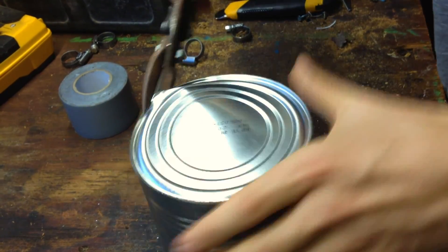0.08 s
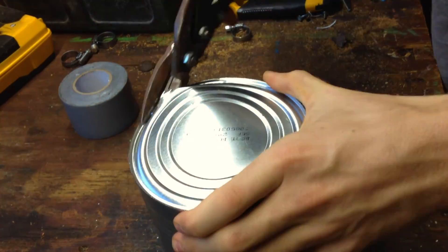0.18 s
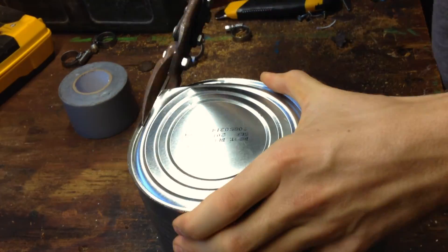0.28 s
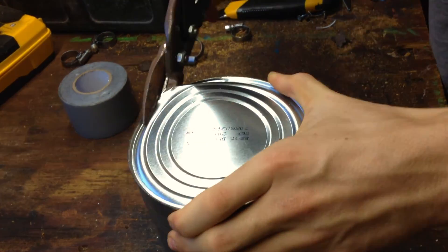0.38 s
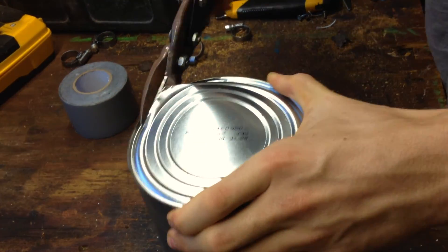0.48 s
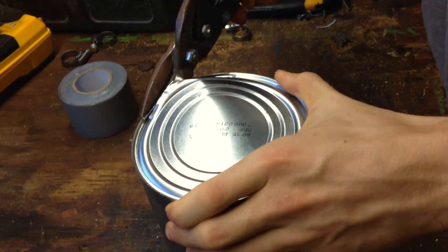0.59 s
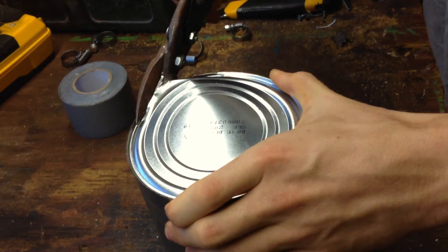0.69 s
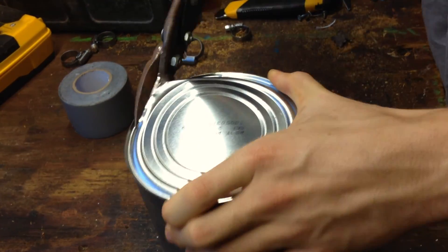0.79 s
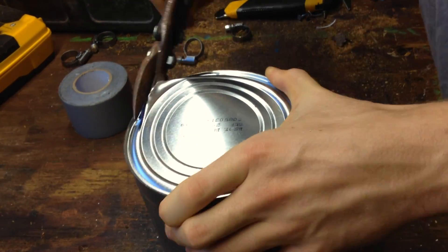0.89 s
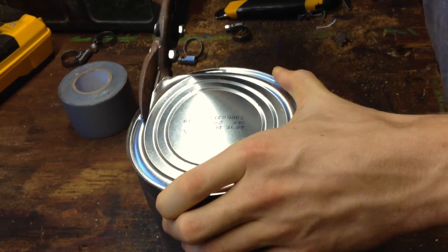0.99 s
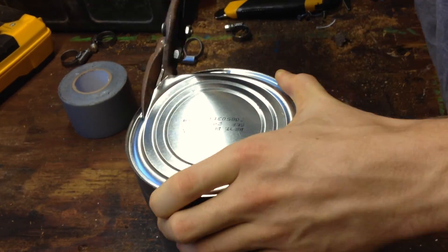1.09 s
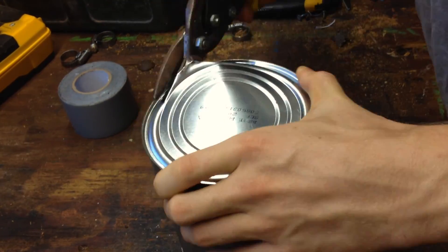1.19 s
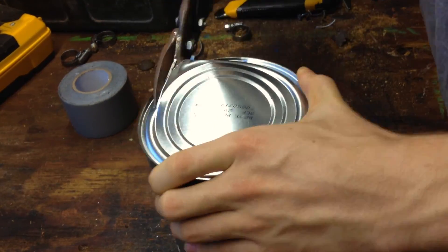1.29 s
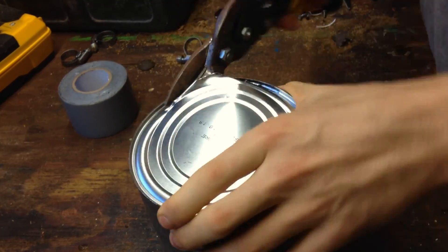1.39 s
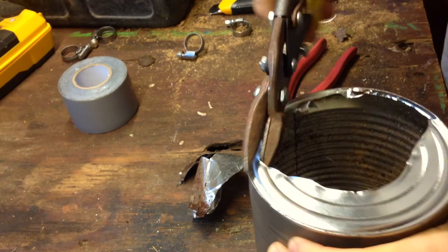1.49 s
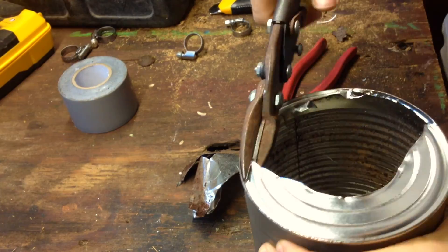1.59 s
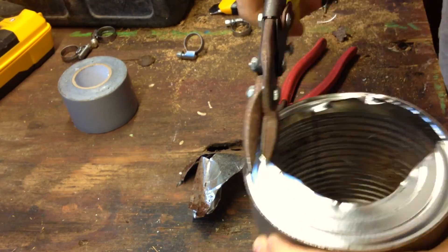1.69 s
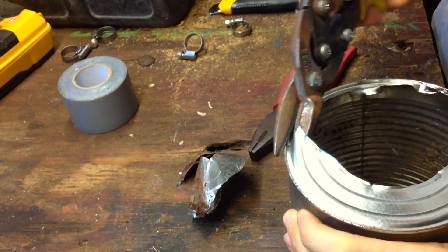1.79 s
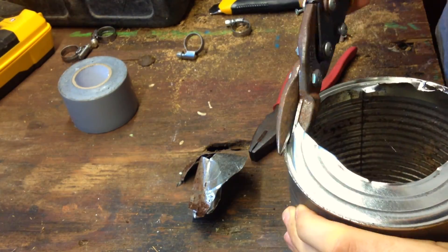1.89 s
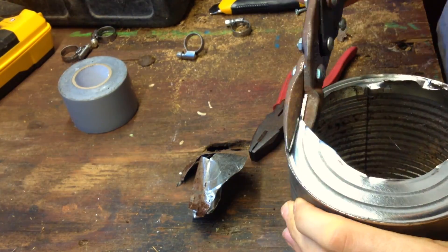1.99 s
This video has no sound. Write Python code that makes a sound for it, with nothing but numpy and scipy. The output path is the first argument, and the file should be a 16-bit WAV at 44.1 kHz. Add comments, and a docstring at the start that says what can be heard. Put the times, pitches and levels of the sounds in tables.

```python
"""Tin snips cutting a can

Close by at a workbench, tin snips bite round the rim of a thin steel can held in one hand.
The steel parts in sharp cracks, the wall pops as it buckles, and the blades grate and squeak along
the cut edge. The hand keeps the can's ring short, and it all dies away in a small workshop."""
import sys
import numpy as np
from scipy import signal
from scipy.fft import rfft, irfft
from scipy.io import wavfile

SR = 44100
rng = np.random.default_rng(int(sys.argv[2]) if len(sys.argv) > 2 else 0)


def unload_audio(sound):
    """Save the sound as a 16-bit wav file, at the path given as the first command line argument."""
    columns = np.transpose(np.atleast_2d(sound))
    # keep every value between -1 and 1, then stretch to whole-number steps
    steps = np.round(np.clip(columns, -1, 1) * 32767)
    wavfile.write(sys.argv[1], SR, steps.astype(np.int16))


N = 88200
T = np.arange(4096) / SR  # time in seconds within one short sound

# Levels in all tables are relative. A t60 is the time a ring takes to fade by 60 dB.
# the notes at which the hand-held can rings: f/Hz, level/dB
CAN_NOTES = [(785, -12.5), (1060, -4), (1491, 0), (2207, -9.5), (5345, 1.5)]
CAN_T60_S = .024
# tone colour of the can's thin wall: f/Hz, level/dB
WALL_COLOUR = [(330, -33), (550, -7.5), (670, 5), (1100, 4.5), (1550, 1), (2100, -2), (5000, -31)]
# tone colour of the steel's hiss and ticks: f/Hz, level/dB
HISS_COLOUR = [(400, -54), (2000, 7), (4400, 1), (7200, 2.5), (16000, -8)]


def amp(db):
    """Turn decibels into a gain."""
    return 10 ** (np.asarray(db) / 20)


def unit(x, window_s=.003):
    """Give a short burst the same energy as a level of 1 held for window_s."""
    return x * np.sqrt(window_s * SR / np.sum(x ** 2))


def add(track, start, x):
    """Mix a short sound into a track, start seconds in."""
    i = max(int(start * SR), 0)
    track[i:i + len(x)] += x[:max(N - i, 0)]


def response(colour, size=2048):
    """Make a filter with this tone colour, in the form of its answer to a single click."""
    hz, db = np.array(colour).T
    f = np.maximum(np.arange(size // 2 + 1) * SR / size, 1)
    gain = amp(np.interp(np.log(f), np.log(hz), db))
    # minimum phase: pack the filter's energy as early as it can go
    cepstrum = irfft(np.log(gain))
    cepstrum[1:size // 2] *= 2
    cepstrum[size // 2 + 1:] = 0
    click = irfft(np.exp(rfft(cepstrum)))
    return click / np.linalg.norm(click)


def through(x, click):
    """Pass a sound through a filter, given its answer to a click."""
    return signal.fftconvolve(x, click)[:len(x)]


def radiate(x, low_hz=666):
    """So small a sheet of steel gives off little bass."""
    return signal.sosfilt(signal.butter(2, low_hz, "high", fs=SR, output="sos"), x)


def room_air():
    """Quiet, steady air fills the workshop."""
    # tone colour of the air: f/Hz, level/dB
    air_colour = [(220, -37), (320, -15), (1000, -4), (2500, -14.5), (16000, -24)]
    return amp(-60) * through(rng.standard_normal(N), response(air_colour))


def scrapes(catches_per_s=300, puff_fade_s=.0015, ramp_s=.0076, steady_rub=.35):
    """The blades rub, catch and slip at random; each catch taps the wall and frees a puff of hiss."""
    # blades grating along the edge: start/s, length/s, wall level/dB, hiss level/dB
    strokes = [(0.03, 0.035, -41.5, -43.5), (0.121, 0.061, -37, -46.5), (0.188, 0.064, -36.5, -48.5),
               (0.367, 0.053, -41, -49), (0.431, 0.095, -46.5, -44.5), (0.639, 0.058, -42, -54.5),
               (0.711, 0.038, -39.5, -42), (0.834, 0.014, -38.5, -33), (1.373, 0.095, -44.5, -45),
               (1.518, 0.033, -36, -35.5), (1.542, 0.066, -46.5, -45), (1.635, 0.086, -44, -43),
               (1.727, 0.068, -44, -42.5), (1.802, 0.045, -43.5, -44), (1.906, 0.045, -46, -41),
               (1.987, .03, -43.5, -44)]
    t, out = np.arange(N) / SR, np.zeros(N)
    catches = (rng.random(N) < catches_per_s / SR) * amp(.5 * rng.standard_normal(N))
    taps = through(catches * rng.choice([-1, 1], N), response(WALL_COLOUR))
    puffs = through(catches, np.exp(-T / puff_fade_s))
    hiss = through((steady_rub + puffs) * rng.standard_normal(N), response(HISS_COLOUR))
    for start, length, wall_db, hiss_db in strokes:
        press = np.clip(np.minimum(t - start, start + length - t) / ramp_s, 0, 1)
        for layer, db in ((taps, wall_db), (hiss, hiss_db)):
            stroke = press * layer
            out += amp(db) * stroke * np.linalg.norm(press) / np.linalg.norm(stroke)
    return out


def ring(x, notes, t60, scatter=0):
    """A sound sets fading notes ringing; scatter varies them, as the blades touch a new spot each time."""
    t = np.arange(int(t60 * SR)) / SR
    rate, tones = np.log(1000) / t60, np.zeros(len(t))
    shifts = scatter * rng.standard_normal((len(notes), 2))
    for (hz, db), (louder, sharper) in zip(notes, shifts):
        tones += amp(db + 3 * louder) * np.cos(2 * np.pi * hz * (1 + .025 * sharper) * t)
    return through(x, tones * 2 * rate / SR * np.exp(-rate * t))


def hollow(bending):
    """The bending wall pumps the air inside the closed can, which rings faintly."""
    # notes of the trapped air: f/Hz, level/dB
    air_notes = [(322, 15.5), (490, 0.5)]
    return ring(bending, air_notes, t60=.17)


def flex(hz, cycles):
    """The wall swings over and settles within a few cycles."""
    age = T * hz / cycles
    swing = age ** 3 * np.exp(-2 * age) * np.sin(2 * np.pi * hz * T)
    return unit(radiate(swing))


def fracture(rise_s, fade_s, tone_filter, snap_db=8, snap_s=.00015, unevenness=.9):
    """Tiny uneven breaks build up while the steel tears, spike as it gives way, then fade."""
    push, size = rng.standard_normal((2, len(T)))
    breaks = push * np.exp(unevenness * size)
    build = np.minimum(T / max(rise_s, 1 / SR), 1)
    fade = np.exp(-np.maximum(T - rise_s, 0) / fade_s)
    snap = 1 + amp(snap_db) * np.exp(-np.abs(T - rise_s) / snap_s)
    return unit(through(breaks * build * fade * snap, tone_filter))


def cracks(wall_fade_s=.0059, edge_fade_s=.003):
    """Each crack kicks the wall, knocks the blades, fizzes along the torn edge and rings the can."""
    # steel parting: t/s, wall level/dB, wall f/Hz, clack level/dB, fizz level/dB, tearing time/s
    bites = [(.0612, -39.5, 980, -30, -39.5, 0.00088), (.094, -38, 954, -37, -34.5, 0.00014),
             (.1342, -34, 1430, -31.5, -29.5, 0.0008), (.1975, -35, 1340, -29, -21.5, 0.00074),
             (0.2097, -19.5, 790, -20.5, -27.5, 0.00091), (0.32, -19.5, 1026, -20.5, -24, 0.0029),
             (0.4858, -26, 1360, -24, -31, 0.00034), (.4950, -14, 1270, -18, -18, 0.0029),
             (0.537, -24, 1204, -27, -28, 0.00046), (0.5445, -27.5, 1450, -25, -23, 0.0014),
             (0.5721, -31, 1410, -27, -19.5, 0.00017), (0.5830, -23.5, 1410, -15.5, -17, 0.00079),
             (0.7866, -12.5, 1288, -12.5, -10, 0.000049), (0.9285, -11.5, 1296, -18, -13, 0.0021),
             (1.0954, -17, 1310, -14, -10.5, 0.00064), (1.2512, -21.5, 1390, -20, -23.5, 0.0043),
             (1.314, -24.5, 1235, -24, -44, 0.0022), (1.3275, -21.5, 1430, -22, -26.5, 0.0017),
             (1.4137, -16.5, 1433, -25.5, -25.5, 0.0021), (1.4212, -27, 1230, -20, -24, 0.0012),
             (1.4390, -14, 1217, -12, -15.5, 0.00147), (1.6613, -27, 2050, -31.5, -18.5, 0.00033),
             (1.7008, -28, 870, -21.5, -20, 0.0001), (1.829, -39, 1980, -28.5, -32.5, 0.0013),
             (1.8637, -59, 2070, -31.5, -48, 0.00016), (1.882, -33.5, 2010, -32, -31.5, 0.0011)]
    # tone colour of the blades' clack: f/Hz, level/dB
    clack_colour = [(200, -39), (1200, -1), (2200, -3), (3900, 0.5), (6300, -1.5), (8000, -10),
                    (16000, -5.5)]
    # tone colour of the torn edge's fizz: f/Hz, level/dB
    fizz_colour = [(300, -31), (3500, -47.5), (8300, -5), (12000, -8.5), (16000, -20.5)]
    wall, blades, edge = response(WALL_COLOUR), response(clack_colour), response(fizz_colour)
    out = np.zeros(N)
    for start, wall_db, hz, clack_db, fizz_db, tear_s in bites:
        rattle = amp(-5.5) * fracture(tear_s, wall_fade_s, wall)
        kick = amp(wall_db) * unit(flex(hz, cycles=1.2) + rattle)
        clack = amp(clack_db) * fracture(tear_s, edge_fade_s, blades)
        fizz = amp(fizz_db) * fracture(tear_s, edge_fade_s, edge)
        crack = kick + clack + fizz
        add(out, start, crack + ring(crack, CAN_NOTES, CAN_T60_S, scatter=.97))
    return out


def pops(rise_s=.0012, fade_s=.0025):
    """The bent wall snaps into a new shape with a short dull pop and a faint tick."""
    # the wall buckling: t/s, level/dB, f/Hz
    buckles = [(0.2238, -24.5, 724), (0.238, -26, 780), (.370, -26, 1100), (0.47, -28.5, 1130),
               (0.664, -26, 910), (0.7267, -26, 1070), (.758, -31.5, 1110), (0.838, -32, 1230),
               (0.8486, -23.5, 1170), (1.064, -32, 1336), (1.1475, -22, 1480), (1.171, -29.5, 1070),
               (1.1889, -31, 1020), (1.2325, -27.5, 1270), (1.334, -20.5, 830), (1.398, -19, 1100),
               (1.469, -36.5, 1390), (1.484, -31.5, 1240), (1.4959, -30, 1130), (1.5035, -32.5, 1220),
               (1.5114, -29.5, 1190), (1.5239, -25, 1400), (1.7626, -27, 790)]
    out, wall, hiss = np.zeros(N), response(WALL_COLOUR), response(HISS_COLOUR)
    for start, db, hz in buckles:
        rattle = amp(-5.5) * fracture(rise_s, fade_s, wall)
        tick = amp(-8) * fracture(rise_s, fade_s, hiss)
        pop = amp(db) * (unit(flex(hz, cycles=.87) + rattle) + tick)
        add(out, start, pop + ring(pop, CAN_NOTES, CAN_T60_S, scatter=1))
    return out


def squeaks(waver=.24):
    """Steel drags on steel and a strip of the edge sings briefly, at a pitch set by where it is gripped."""
    # squeaks and pings of the cut edge: t/s, f/Hz, level/dB, swell time/s
    pings = [(0.444, 5100, -35.5, 0.0034), (0.495, 2185, -21.5, 0.0042), (0.788, 6740, -37, 0.0013),
             (0.928, 5350, -17.5, 0.0024), (1.096, 2036, -19.5, 0.0023), (1.416, 3860, -24, 0.0046),
             (1.4375, 7650, -16.5, 0.002), (1.44, 1865, -16, 0.0035), (1.7005, 6380, -17, 0.0017)]
    out = np.zeros(N)
    for start, hz, db, swell_s in pings:
        pitch = hz * (1 + waver * rng.standard_normal(len(T)))
        tone = np.sin(2 * np.pi * np.cumsum(pitch) / SR)
        swell = T * np.exp(-T / swell_s)
        add(out, start, amp(db) * unit(radiate(swell * tone)))
    return out


def thud(start_s=.7868, hz=327):
    """A brief, dull low thump sounds under the loudest crack."""
    out, phase = np.zeros(N), 2 * np.pi * hz * T
    add(out, start_s, amp(-32) * unit(np.exp(-phase / 2) * np.sin(phase)))
    return out


def flap(cutting):
    """From 1.54 s the scene changes: the can now stands open, and a loose flap of its lid rings along with the
    cutting."""
    # notes of the flap: f/Hz, level/dB
    flap_notes = [(935, 4), (2058, 6)]
    return ring(cutting, flap_notes, t60=.018)


def workshop(x, bench_fade_s=.0046, low_t60_s=.3, treble_t60_s=.2, split_hz=6200):
    """Quick echoes come off the bench and hand, then a short room tail whose treble dies first."""
    t = np.arange(N // 4) / SR
    near, far = rng.standard_normal((2, len(t)))
    low = signal.sosfilt(signal.butter(2, split_hz, fs=SR, output="sos"), far)
    treble = far - low
    tail = low * amp(-60 * t / low_t60_s) + treble * amp(-60 * t / treble_t60_s)
    bench = near * t * np.exp(-2 * t / bench_fade_s)
    echoes = amp(-5.5) * bench / np.linalg.norm(bench) + amp(-20.5) * tail / np.linalg.norm(tail)
    return x + through(x, echoes)


def scene(open_from_s=1.54):
    """The cutting rings the can, after the scene changes its loose flap, and the room, over quiet air."""
    is_open = np.arange(N) / SR > open_from_s
    rubbing = scrapes()
    bending = pops() + rubbing + ring(rubbing, CAN_NOTES, CAN_T60_S)
    cutting = cracks() + bending
    can = cutting + flap(cutting * is_open) + hollow(bending * ~is_open)
    air = room_air()
    return (amp(-5.5) * workshop(can + squeaks() + thud()) + air)[None]


def record(dry, top_hz=15800):
    """Round off the highest peaks and cut the very top of the treble."""
    return signal.sosfilt(signal.ellip(8, .2, 70, top_hz, fs=SR, output="sos"), np.tanh(dry))


dry = scene()
out = record(dry)
unload_audio(out)
```